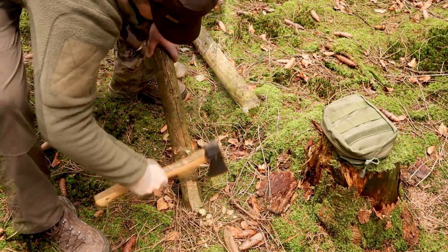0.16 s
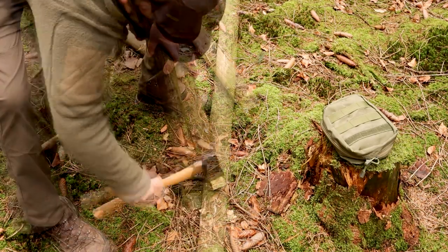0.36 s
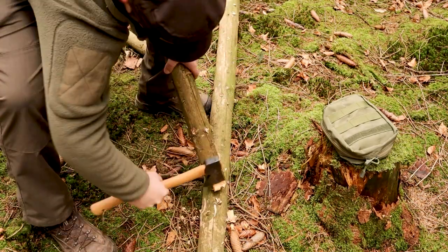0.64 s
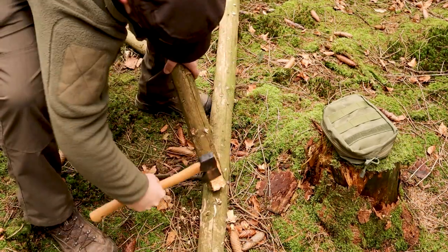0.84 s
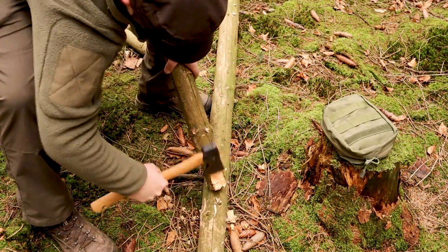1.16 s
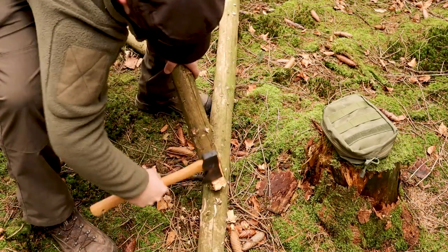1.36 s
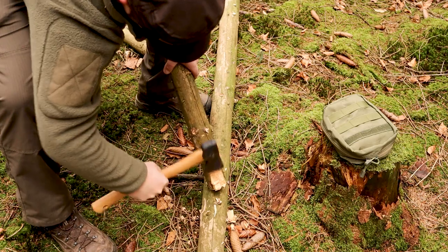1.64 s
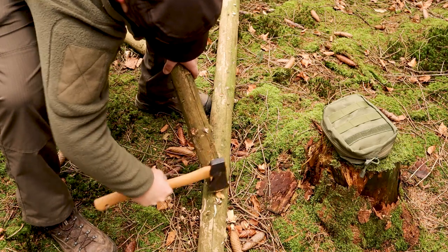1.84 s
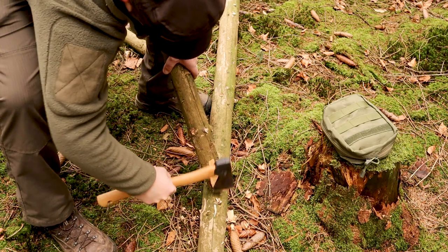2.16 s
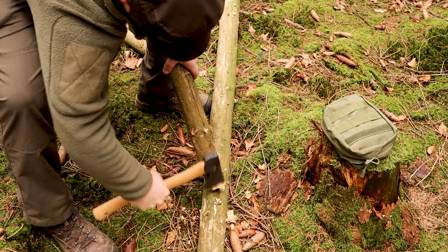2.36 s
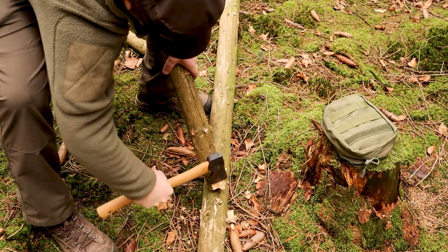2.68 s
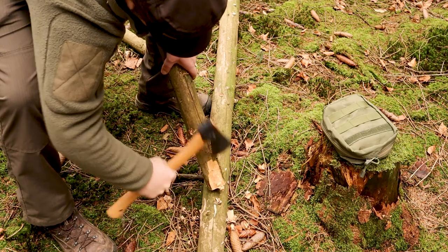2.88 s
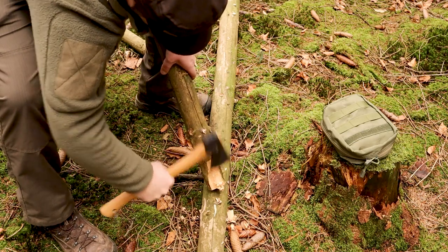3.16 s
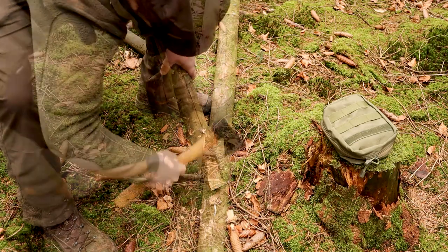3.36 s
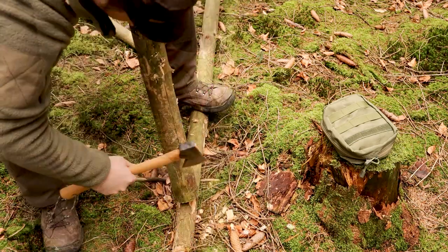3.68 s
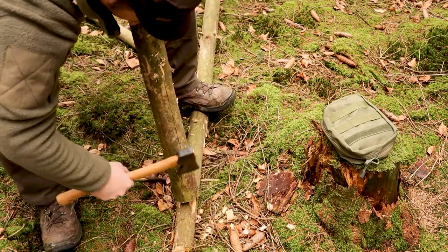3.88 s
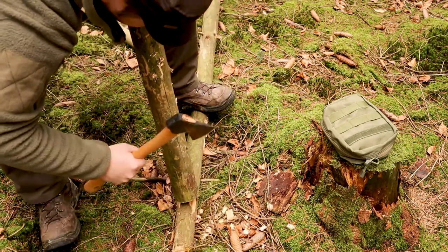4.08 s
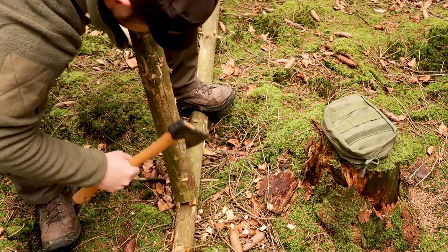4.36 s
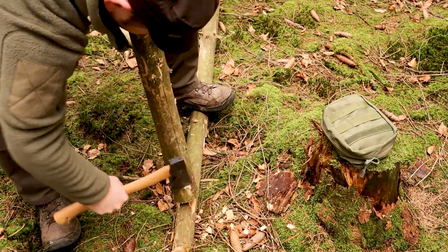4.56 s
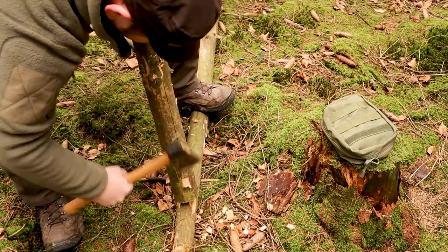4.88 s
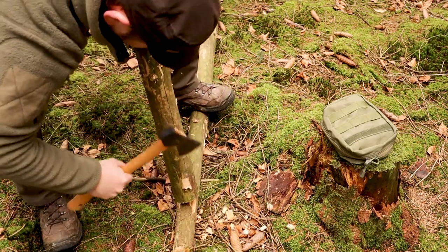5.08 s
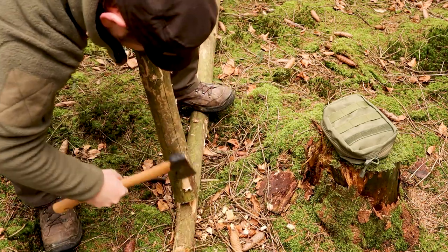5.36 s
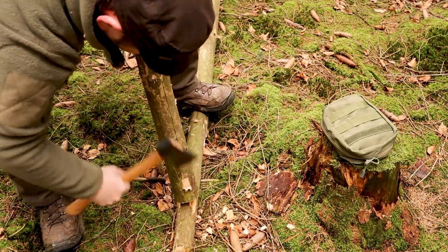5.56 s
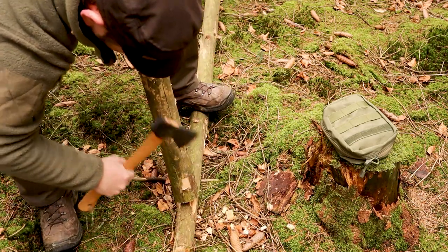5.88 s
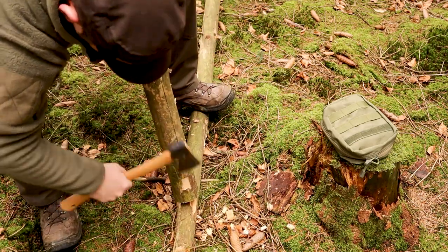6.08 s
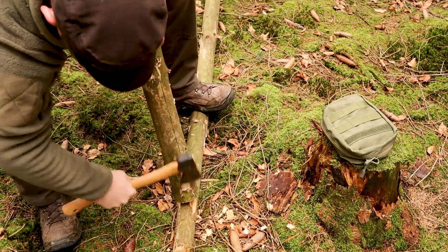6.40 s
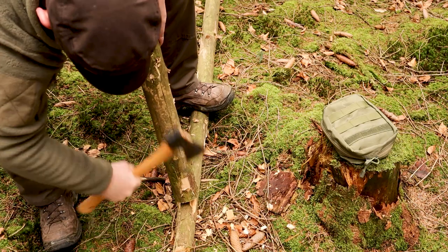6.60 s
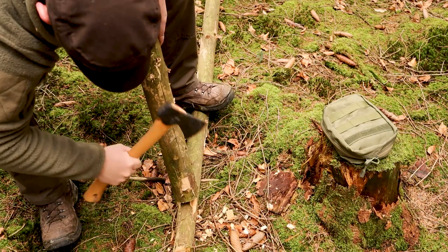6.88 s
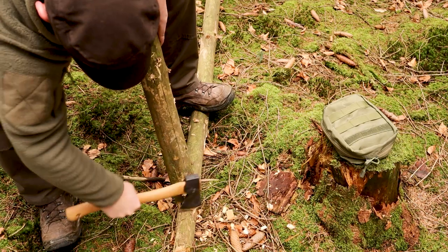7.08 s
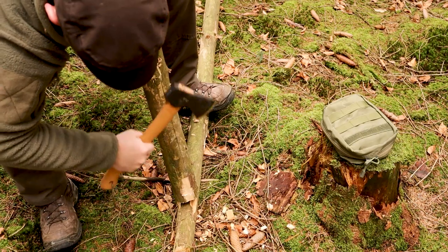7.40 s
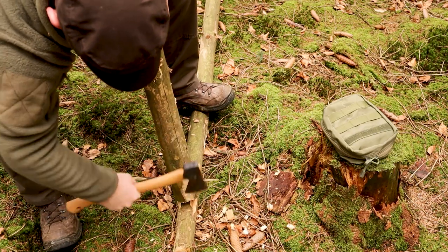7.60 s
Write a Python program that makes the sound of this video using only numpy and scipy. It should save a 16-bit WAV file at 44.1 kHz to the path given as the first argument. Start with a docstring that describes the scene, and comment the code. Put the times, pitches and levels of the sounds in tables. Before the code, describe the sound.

A small hatchet strikes a green pole about four times a second, each blow a short hollow knock with a crisp tearing of fibres. After a brief pause around 3.5 seconds the chopping resumes a little slower, with a different wooden tone. Close microphone, mono, quiet forest with a soft diffuse echo, faint air rumble and a very distant two-note bird.

```python
"""A small hatchet points a green pole in a quiet forest, about three chops a second; a far bird repeats two notes.
Each blow rings the damped modes of the pole; the edge bites, fibres tear as rough noise, chips patter on leaves.
After a pause the pole is held another way and rings with other modes; the bird sings again towards the end.
Throughout, the trees answer with a diffuse noise tail, litter crackles and the air is a soft wash over a rumble."""
import sys
import numpy as np
from scipy import signal
from scipy.fft import rfft, irfft
from scipy.io import wavfile

SR = 44100
rng = np.random.default_rng(int(sys.argv[2]) if len(sys.argv) > 2 else 0)


def output_pcm(signal):
    """Save a mono or channel-first signal as 16-bit PCM at the path in sys.argv[1].

    Samples are clipped to [-1, 1] before scaling.
    """
    pcm = np.clip(np.atleast_2d(signal).T, -1, 1) * 32767
    wavfile.write(sys.argv[1], SR, np.round(pcm).astype(np.int16))


N = 341334

# chops: t/s, knock level/dB, pitch factor of the pole, cut to pole's end/m, splitting fibres level/dB,
# delay until they give/s
CHOPS = [(0.1281, -18.7, 1.02, 0.24, -26.5, 0.0076), (0.4614, -20.5, 0.86, 0.35, -14.5, 0.0029),
         (0.6981, -16.5, 0.96, 0.11, -26.5, .011), (0.9487, -14.5, 0.99, 0.081, -29, 0.0022),
         (1.1811, -14, 0.96, 0.19, -30.5, 0.0036), (1.4214, -13, 0.98, .22, -27.5, 0.0064),
         (1.6553, -14, 0.94, 0.24, -15.5, 0.0018), (1.8973, -28.5, 1, 0.14, -18.5, 0.005),
         (2.172, -19, 0.98, 0.37, -31, 0.0093), (2.4698, -20.5, .93, 0.32, -34, 0.008),
         (2.745, -17, 0.99, 0.36, -33.5, 0.007), (3.0305, -17, 0.93, 0.044, -28.5, 0.0054),
         (3.298, -12.5, .97, 0.21, -25, 0.0038), (3.9347, -35.5, 1.08, 0.44, -62.5, 0.0016),
         (4.301, -14.5, 1.164, 0.46, -34.5, 0.0022), (4.671, -15, 1.04, 0.089, -22, 0.0063),
         (5.0271, -11.5, .994, 0.21, -30, 0.00273), (5.3533, -11.5, 1.046, 0.23, -25.5, 0.0016),
         (5.7091, -12.5, 1.024, 0.091, -16.5, 0.0044), (6.058, -12.5, 1.104, 0.25, -21, 0.0018),
         (6.399, -16, 1.076, 0.43, -19.5, 0.003), (6.7543, -11, 1.066, 0.45, -19, 0.0026),
         (7.1275, -16.5, 1.066, 0.074, -13.5, .0037), (7.614, -15.5, 1.134, 0.45, -29.5, 0.0077)]
# colour of tearing fibres: f/Hz, relative level/dB
FIBRE_COLOUR = [(200, -19.5), (700, 0), (1400, 1), (2100, 4.5), (2600, -8), (3200, 5.5), (4500, -1),
                (7000, -4.5), (8300, -3.5), (10000, -17), (12500, -10), (15000, -13.5), (16500, -25.5)]
NEW_HOLD_S = 3.6  # the pole is held another way from here on


def gain_of(db):
    """Decibels to gain."""
    return 10 ** (np.asarray(db) / 20)


def evened(x):
    """Scales to rms 1."""
    return x / np.sqrt(np.mean(x ** 2) + 1e-20)


def read(points, hz):
    """Reads a spectrum on a log-frequency axis."""
    f, value = np.transpose(points)
    return np.interp(np.log(hz + 1), np.log(f + 1), value)


def add(mix, s, sound):
    """Mixes a sound in at time s, cut off at the end of the mix."""
    part = mix[max(round(s * SR), 0):][:len(sound)]
    part += sound[:len(part)]


def seconds(size):
    """Time axis of so many samples."""
    return np.arange(size) / SR


def coloured(x, points):
    """Filters a sound by a spectrum, with zero phase."""
    hz = np.fft.rfftfreq(len(x), 1 / SR)
    return irfft(rfft(x) * gain_of(read(points, hz)), len(x))


def click(points, size=1024):
    """Minimum-phase click of energy 1 with the given spectrum."""
    hz = abs(np.fft.fftfreq(size, 1 / SR))
    log_gain = np.log(gain_of(read(points, hz)))
    spectrum = np.exp(np.conj(signal.hilbert(log_gain)))
    h = np.fft.ifft(spectrum).real[:size // 2]
    return h / np.linalg.norm(h)


def dulled(x, hz):
    """Gentle one-pole low-pass."""
    r = np.exp(-2 * np.pi * hz / SR)
    return signal.lfilter([1 - r], [1, -r], x)


def decaying_sine(hz, t60, t, pitch=1):
    """A mode that falls 60 dB in t60 seconds."""
    return np.exp(-np.log(1000) * t / t60) * np.sin(2 * np.pi * hz * pitch * t)


def knock(s, db, bass_db_per_octave, treble_db_per_octave, pitch, place_m, pivot_hz=650):
    """The pole rings; place and hardness of the blow tilt its bending modes, which alternate in sign."""
    # modes in each hold: f before the pitch factor/Hz, relative level/dB, longest t60/s
    first_modes = [(222.4, -8, 0.029), (289, -10.5, 0.11), (347.5, -13.5, 0.035), (437, -4, 0.084),
                   (597.7, 1, 0.017), (870, 0, 0.038), (956, -3.5, 0.063), (1238, 2, 0.12),
                   (1600, -10.5, 0.1), (1767, 1, 0.0037), (2160, -5.5, 0.022), (2408, -7.5, 0.023)]
    second_modes = [(163, -24, .09), (273, -24, 0.072), (410, -11, 0.11), (413, -6, 0.013), (616, 1, 0.037),
                    (780, -6.5, 0.07), (887, -1, 0.044), (928.5, 9, 0.012), (1221, -7.5, 0.032),
                    (1352, -13, 0.038), (1520, -14, 0.045), (1593, -13, 0.016), (2010, -21.5, 0.016),
                    (2277, -18, .04)]
    place_db = 2  # modes that swing widely at the cut are louder, those with a node there softer
    bending_m2_per_s = 275  # squared wavelength of a bending mode times its frequency
    hz, mode_db, t60 = np.transpose(first_modes if s < NEW_HOLD_S else second_modes)[:, :, None]
    t60 = np.minimum(t60, .028 + 10 / hz)  # wet wood damps the higher modes quickly
    t = seconds(size=8192)
    octaves = np.log2(hz / pivot_hz)
    wavelength_m = np.sqrt(bending_m2_per_s / hz)
    swing = np.cos(2 * 2 * np.pi * place_m / wavelength_m)
    tilt_db = (bass_db_per_octave * np.maximum(-octaves, 0)
               + treble_db_per_octave * np.maximum(octaves, 0))
    level_db = db + mode_db + place_db * swing + tilt_db
    modes = gain_of(level_db) * decaying_sine(hz, t60, t, pitch)
    return modes[::2].sum(0) - modes[1::2].sum(0)


def tear(envelope, bright_db_per_octave, peak_hz, peak_db=6, peak_octaves=0.29, head_db=-11, split_hz=5000):
    """Tearing fibres are rough noise under an envelope, coloured around one peak; the steel head rings."""
    # steel head, damped by the wood: f/Hz, relative level/dB, t60/s
    head_modes = [(3184, -21.5, 0.026), (3410, -25, 0.014), (7970, -28, 0.024)]
    size, t = len(envelope), seconds(size=2048)
    rough = rng.standard_normal(size) * gain_of(2 * rng.exponential(1, size)) * envelope
    rough *= np.linalg.norm(envelope) / np.linalg.norm(rough)
    voice = sum(gain_of(db + head_db) * decaying_sine(f, t60, t) for f, db, t60 in head_modes)
    hz = np.geomspace(100, 20000, num=80)
    peak = peak_db * np.exp(-(np.log2(hz / peak_hz) / peak_octaves) ** 2)
    tilt = bright_db_per_octave * np.clip(np.log2(hz / split_hz), -.4, 1)
    add(voice, 0, click(np.c_[hz, read(FIBRE_COLOUR, hz) + peak + tilt]))
    return signal.fftconvolve(rough, voice)


def shudder(s, db, first_db=-15, second_db=-18, first_s=0.0095, second_s=0.0075, rise_s=0.0013):
    """Bark, fibres and the log below rub as the pole recoils: a short dull rasp between the modes."""
    t = seconds(size=4096)
    trim_db, decay_s = (first_db, first_s) if s < NEW_HOLD_S else (second_db, second_s)
    colour = [(100, -18.5), (230, -4.5), (650, 0.0), (1200, -0.5), (1800, -14.5), (2400, -17.0),
              (4000, -33.5), (9000, -51)]
    rasp = evened(coloured(rng.standard_normal(len(t)), colour))
    envelope = (1 - np.exp(-t / rise_s)) ** 2 * np.exp(1 - t / decay_s)
    return gain_of(db + trim_db) * rasp * envelope


def chops(jolt_hz=3500, bite_s=.0026, split_trim_db=-2.5):
    """The edge bites, the head wedges with a second, duller jolt, and a chip splits off."""
    # first and second hold: share of the second jolt, bite level re force/dB, brightness/dB per octave,
    # chip resonance f/Hz, steel head level/dB
    holds = [(0.77, -6, 1, 3100, -8.5), (0.24, -12, 1.5, 8450, -16.5)]
    jolt_delay_s = 0.002929  # from the edge landing to the head wedging
    usual_knock_db, bass_per_db = -19, .5  # a softer knock is boomier: dB per octave for each dB
    bright_force_db, treble_per_db = -12.5, 0.4949  # a weaker chop is duller: dB per octave for each dB
    # a loud, early split is over sooner; its length halves for each split_halves_db
    usual_split_s, usual_split_db, usual_delay_s, split_halves_db = 0.0022, -27, 0.0064, 16
    out, t = np.zeros(N), seconds(size=2048)
    for s, db, pitch, place_m, split_db, delay in CHOPS:
        jolt, bite_db, bright_db_per_octave, chip_hz, head_db = holds[int(s > NEW_HOLD_S)]
        force_db = (db + split_db) / 2
        bass = bass_per_db * (usual_knock_db - db)
        treble = treble_per_db * (force_db - bright_force_db)
        ring = knock(s, db, bass, treble, pitch, place_m)
        add(out, s, ring)
        add(out, s + jolt_delay_s, jolt * dulled(ring, jolt_hz))
        add(out, s, shudder(s, db))
        delay_factor = np.sqrt(max(delay, 1e-4) / usual_delay_s)
        split_s = usual_split_s * delay_factor * 2 ** ((usual_split_db - split_db) / split_halves_db)
        bite = gain_of(force_db + bite_db) * np.exp(-t / bite_s)
        split = gain_of(split_db + split_trim_db) * np.exp(-abs(t - delay) / split_s)
        add(out, s, tear(bite + split, bright_db_per_octave, chip_hz, head_db=head_db))
    return out


def extra_cracks(peak_db=18, peak_octaves=.45):
    """Some blows carry an extra short, rough crack, coloured around one pitch."""
    # t/s, level/dB, decay/s, f/Hz
    cracks = [(.464, -26.5, 0.001, 3320), (1.658, -22.5, 0.00091, 3440), (3.2977, -18, 0.0034, 1687),
              (4.674, -31.5, .002, 3554), (5.354, -30, 0.0028, 2200), (6.4, -26.5, 0.0015, 3220),
              (7.132, -6, 0.00055, 3920)]
    out, t = np.zeros(N), seconds(size=2048)
    for s, db, decay_s, hz in cracks:
        envelope = gain_of(db) * np.exp(-t / max(decay_s, 1e-4))
        add(out, s, tear(envelope, 0, hz, peak_db=peak_db, peak_octaves=peak_octaves))
    return out


def bumps(pitch=.87, place_m=0.42, crunch_db=-14, crunch_s=0.0042, crunch_bright_db=-12, crunch_hz=8000):
    """The pole knocks on the log under it and bark crunches."""
    # t/s, level/dB, bass tilt/dB per octave, treble tilt/dB per octave
    hits = [(0.7088, -27.5, 5, -9.5), (7.1481, -22.5, 7, -10.5), (7.6347, -23.5, 8.5, 0.5)]
    out, t = np.zeros(N), seconds(size=2048)
    for s, db, bass, treble in hits:
        add(out, s, knock(s, db, bass, treble, pitch, place_m))
        crunch = gain_of(db + crunch_db) * np.exp(-t / crunch_s)
        add(out, s, tear(crunch, crunch_bright_db, crunch_hz))
    return out


def chips(patter_db=-49, flight_s=0.03, per_s=900, bright_db_per_octave=1, leaf_hz=8000, tick_s=0.0023):
    """Crumbs of wood land on dry leaves after each chop, louder after a forceful one; larger chips tick alone."""
    # larger chips landing: t/s, level/dB, brightness/dB per octave
    ticks = [(0.531, -50, -12), (0.761, -53.5, 2), (2.552, -57.5, 3), (3.345, -49.5, 16),
             (4.7193, -43.5, 29), (5.78, -63.5, 27), (7.254, -54, 16)]
    out, t = np.zeros(N), seconds(size=8192)
    for s, db, _, _, split_db, _ in CHOPS:
        landing = rng.random(len(t)) < per_s / SR
        crumbs = evened(dulled(landing * rng.exponential(1, len(t)), 300))
        shower = crumbs * (t / flight_s) ** 2 * np.exp(2 - 2 * t / flight_s)
        level = gain_of((db + split_db) / 2 + patter_db)
        add(out, s, tear(level * shower, bright_db_per_octave, leaf_hz))
    for s, db, tick_bright in ticks:
        add(out, s, tear(gain_of(db) * np.exp(-t / tick_s), tick_bright, leaf_hz))
    return out


def forest(x, near_db=2, near_t60=0.066, build_s=0.0017):
    """Countless trunks scatter each band back as a diffuse tail: the near ones quickly, the far ones slowly."""
    # answer of the trees: f/Hz, relative level/dB
    tree_level = [(100, -40), (300, -30.5), (600, -24), (1200, -31), (2500, -30), (5000, -31), (9000, -35),
                  (16000, -46.5)]
    # decay of the far trees: f/Hz, t60/s
    tree_t60 = [(200, 0.24), (600, 0.24), (1300, 0.88), (3500, 0.28), (8000, 0.79), (16000, .25)]
    frames = dict(nperseg=256, noverlap=192)
    hz, t, z = signal.stft(x, SR, **frames)
    # sound leaves in all directions, so its colour evens out
    blur = np.exp(-((hz[:, None] - hz) / (.3 * hz + 100)) ** 2)
    power = blur / blur.sum(0) @ abs(z) ** 2
    t = t[t < 2]
    arrival = (1 - np.exp(-t / build_s)) ** 2
    far = arrival * np.exp(-2 * np.log(1000) * t / read(tree_t60, hz)[:, None])
    near = arrival * np.exp(-2 * np.log(1000) * t / near_t60)
    tail = far / far.sum(1, keepdims=True) + gain_of(near_db) ** 2 * near / near.sum()
    echo_power = abs(signal.fftconvolve(power, tail, axes=1)[:, :z.shape[1]])
    echo = np.sqrt(echo_power) * gain_of(read(tree_level, hz))[:, None]
    scatter = signal.stft(rng.standard_normal(N), SR, **frames)[2]
    return signal.istft(echo * scatter / scatter.std(), SR, **frames)[1][:N]


def bird(note_s=0.24, high_hz=4550, low_hz=3510, low_after_s=.27, blur_hz=25, direct=2):
    """Level whistles, high and low in turn; many paths through the trees blur each one a little."""
    # start t/s, end t/s, period of the note pairs/s, high note level/dB, low note level/dB
    songs = [(.31, 2, .43, -81, -86), (5.25, 7.7, .475, -85, -82)]
    out, t = np.zeros(N), seconds(size=int(note_s * SR))
    fade = signal.windows.tukey(len(t), .8)
    for start, end, period, high_db, low_db in songs:
        for s in np.arange(start, end, period):
            for at, hz, db in (s, high_hz, high_db), (s + low_after_s, low_hz, low_db):
                noise = rng.standard_normal((2, len(t)))
                a, b = evened(dulled(dulled(noise, blur_hz), blur_hz))
                paths = direct + a + 1j * b
                note = evened((paths * np.exp(2j * np.pi * hz * t)).real)
                add(out, at, gain_of(db) * fade * note)
    return out


def litter(per_s=120, crackle_db=-86, spread_db=3.5):
    """Needles and leaves crackle under the man's weight; now and then boots and knees scuff the moss."""
    # t/s, length/s, level before the fade/dB
    scuffs = [(1.563, 0.045, -60), (1.799, 0.041, -61), (3.305, .11, -50.5), (3.391, 0.12, -59)]
    scuff_colour = [(200, -17), (800, 2.0), (1300, 8), (2200, -23.5), (8000, -32.0), (16000, -33.5)]
    snap_gain = gain_of(spread_db * np.minimum(rng.exponential(1, N), 3))
    snaps = (rng.random(N) < per_s / SR) * snap_gain
    grain = rng.standard_normal(256) * np.exp(-seconds(size=256) / 0.00087)
    crackle = coloured(signal.fftconvolve(snaps, grain)[:N], FIBRE_COLOUR)
    out = gain_of(crackle_db) * evened(crackle)
    for s, length_s, db in scuffs:
        size = int(length_s * SR)
        rub = coloured(rng.standard_normal(size), scuff_colour)
        add(out, s, gain_of(db) * evened(rub) * np.hanning(size))
    return out


def air(air_db=-65, swell_db=-1.45):
    """A soft wash of still forest air, over a lumpy rumble that swells and sinks."""
    # wash: f/Hz, relative level/dB
    wash_colour = [(100, -8), (200, -12.5), (400, -13), (800, -14.5), (1200, -19), (2400, -29.5),
                   (3500, -34.5), (7000, -41), (11500, -42), (16000, -63)]
    # rumble of the air and of the man's shifting weight: t/s, level before the swell/dB
    rumble_level = [(0, -52), (1.2, -62), (2.6, -59.5), (3.3, -69), (3.9, -57.5), (5.2, -56), (6.5, -54.5),
                    (7.74, -59.5)]
    rumble_colour = [(8, -14), (25, -2.5), (50, -2.0), (100, -6.5), (170, -14.0), (300, -28.5),
                     (900, -61.0), (4000, -86.5)]
    t = seconds(size=N)
    swell_hz = np.geomspace(.4, 9, 20)
    swell = evened(sum(np.sin(2 * np.pi * (f * t + rng.random())) / np.sqrt(f) for f in swell_hz))
    wash = gain_of(air_db) * evened(coloured(rng.standard_normal(N), wash_colour))
    rumble = evened(coloured(rng.standard_normal(N), rumble_colour))
    rumble_db = np.interp(t, *np.transpose(rumble_level)) + swell_db * swell
    return wash + rumble * gain_of(rumble_db)


def scene():
    """The chopping and its echo in the quiet wood."""
    work = chops() + extra_cracks() + bumps() + chips()
    return (work + forest(work) + bird() + litter() + air())[None]


def record(dry, edge_hz=16200):
    """Band limit: a linear-phase low-pass."""
    low_pass = signal.firwin(255, edge_hz, window=("kaiser", 9), fs=SR)
    return signal.oaconvolve(dry, low_pass[None], "same")


dry = scene()
out = record(dry)
output_pcm(out)
```